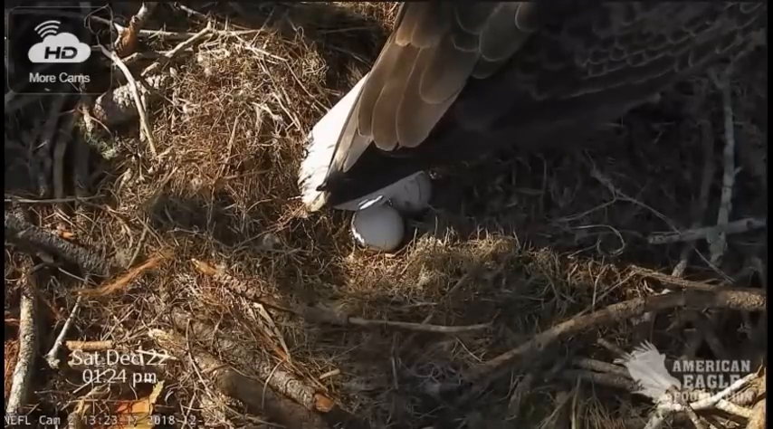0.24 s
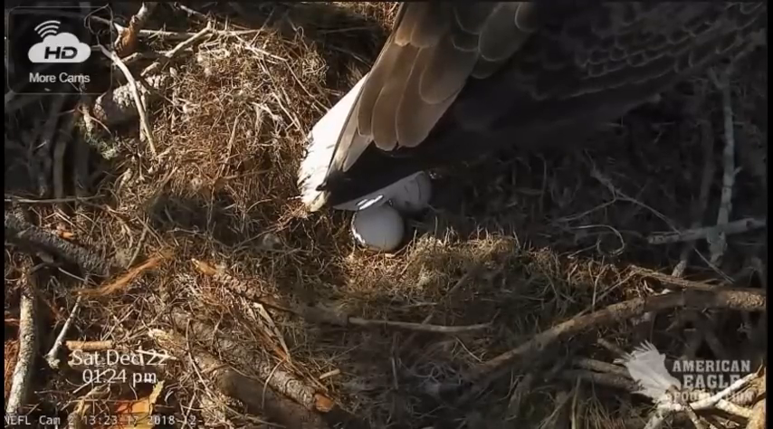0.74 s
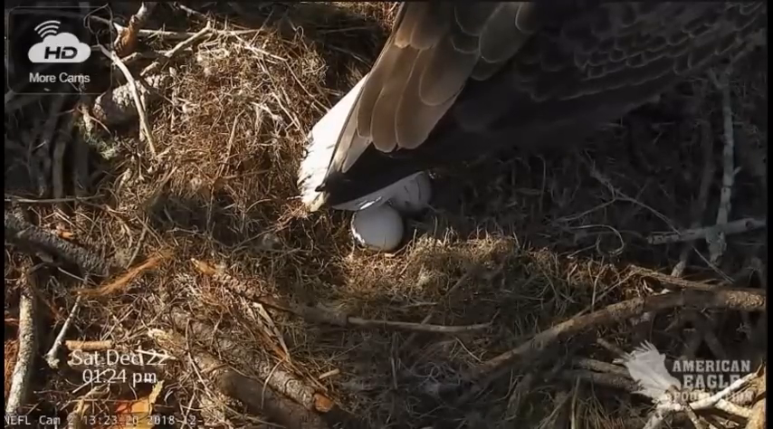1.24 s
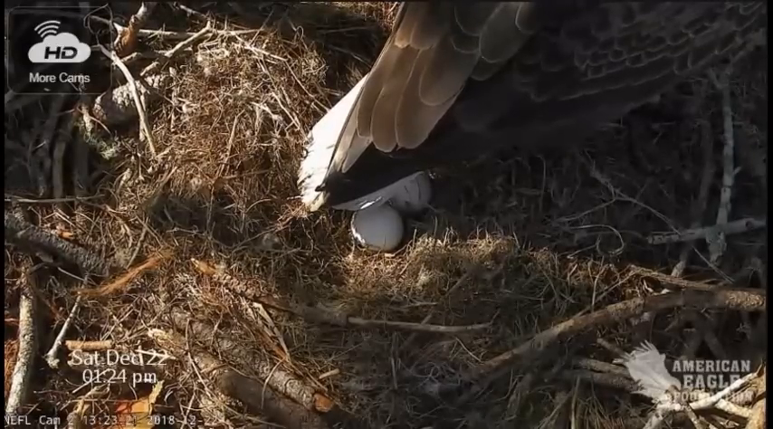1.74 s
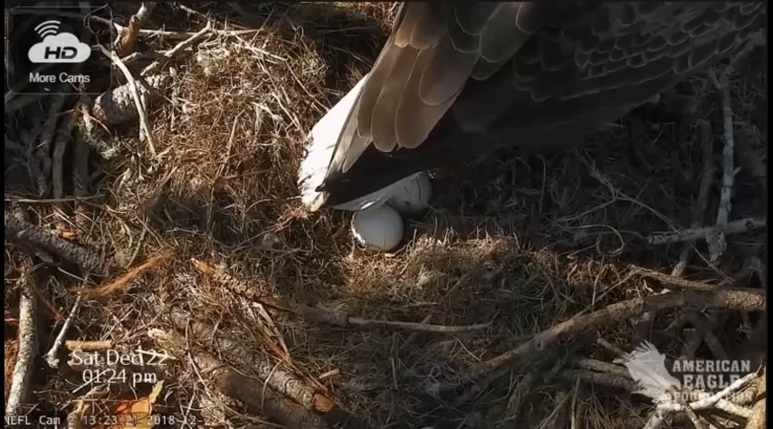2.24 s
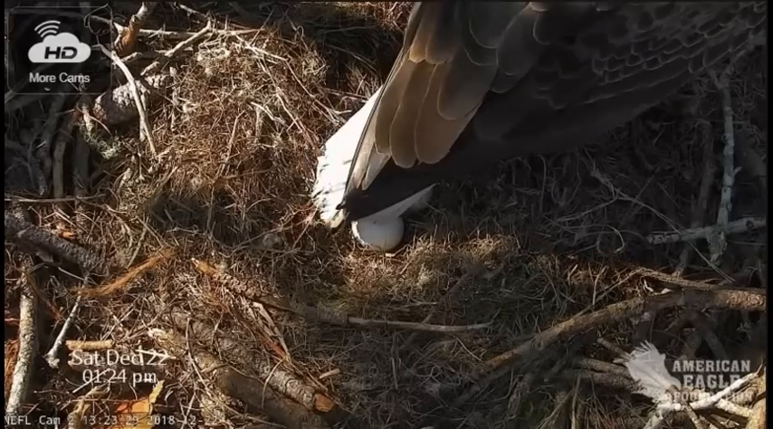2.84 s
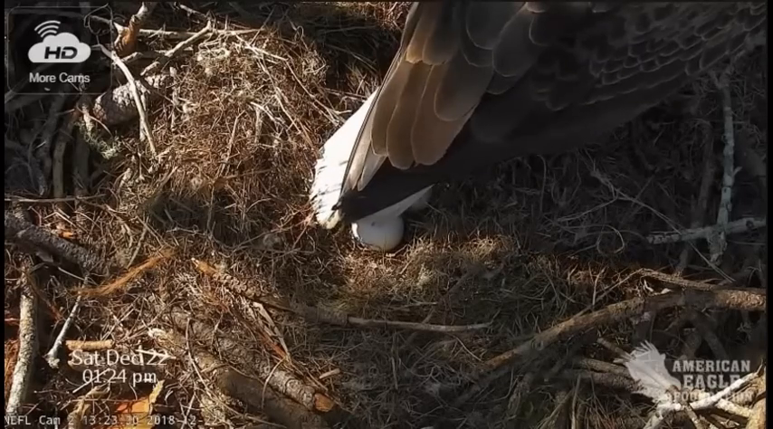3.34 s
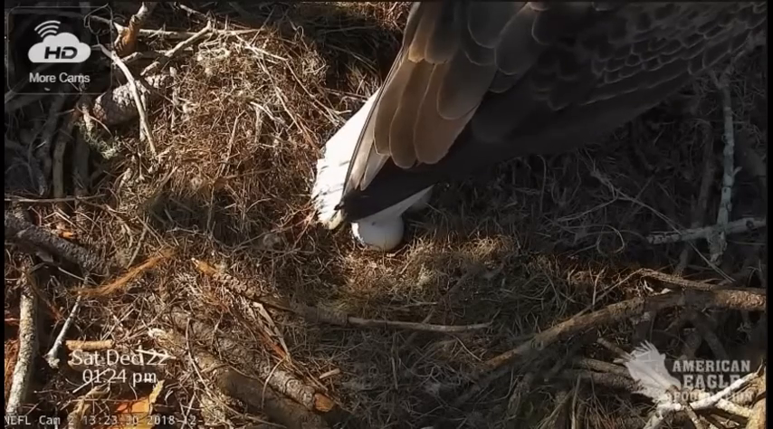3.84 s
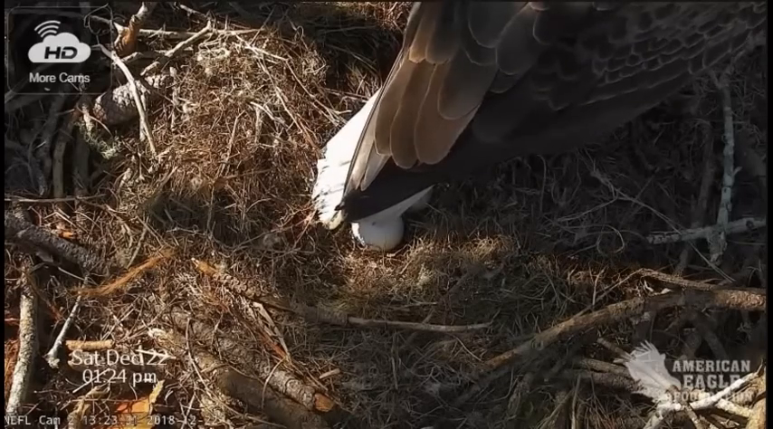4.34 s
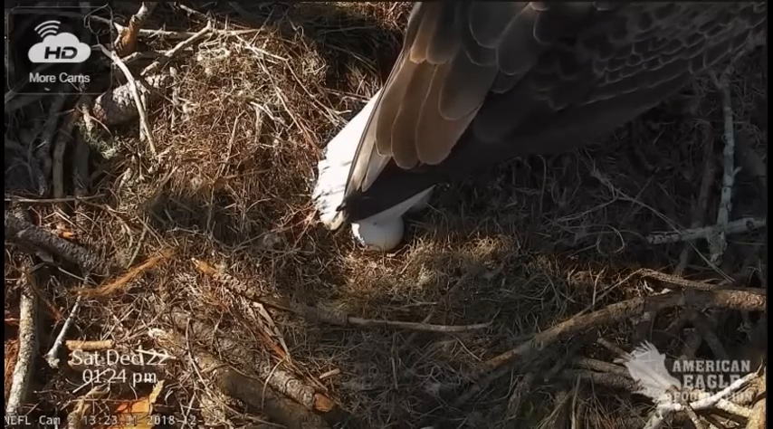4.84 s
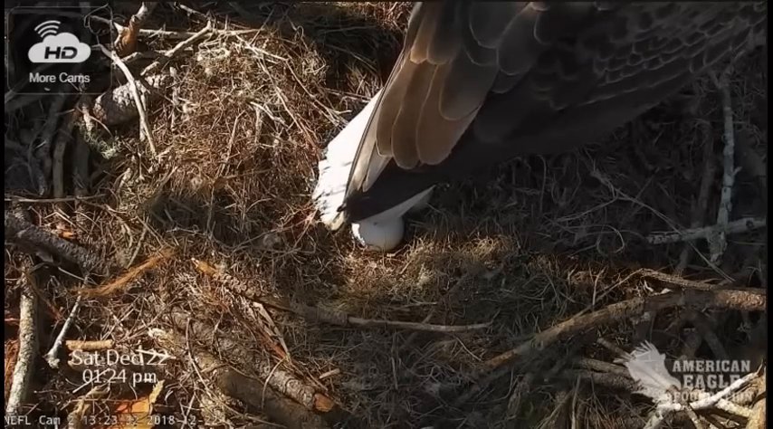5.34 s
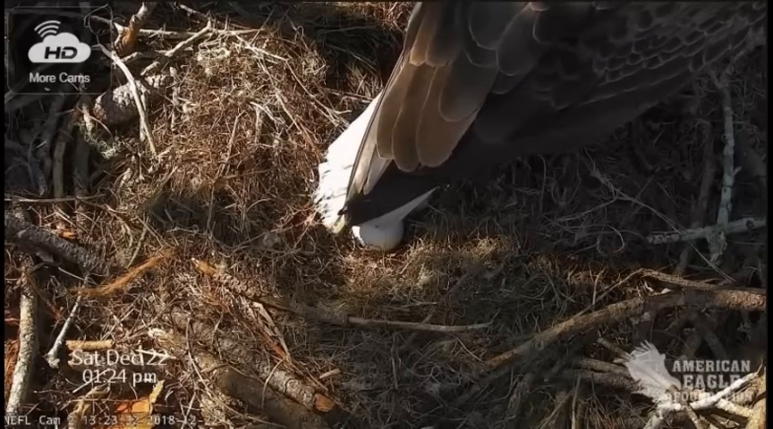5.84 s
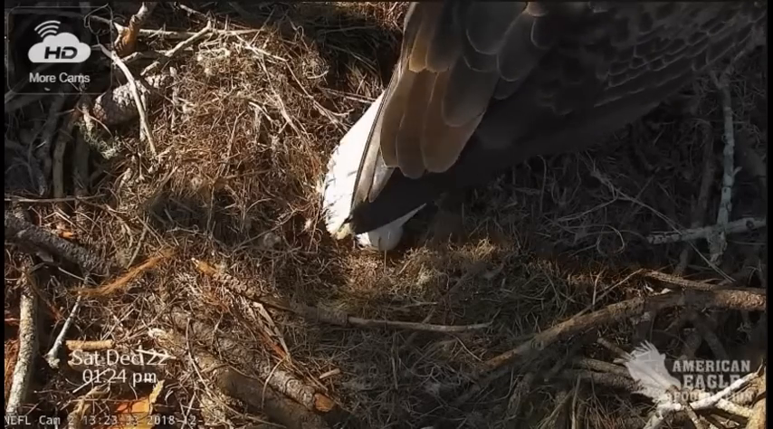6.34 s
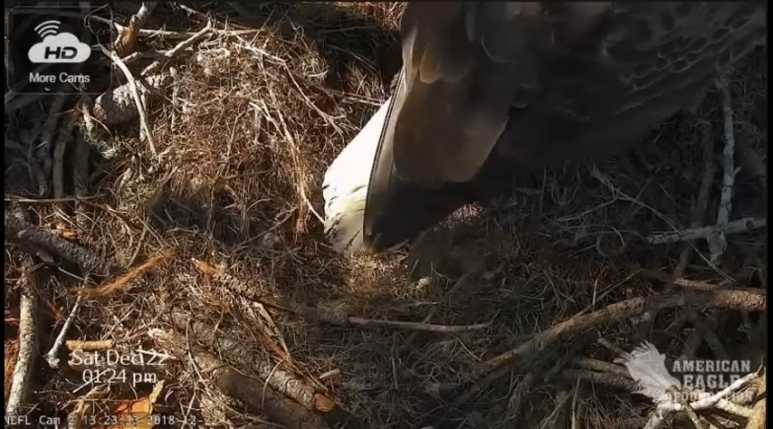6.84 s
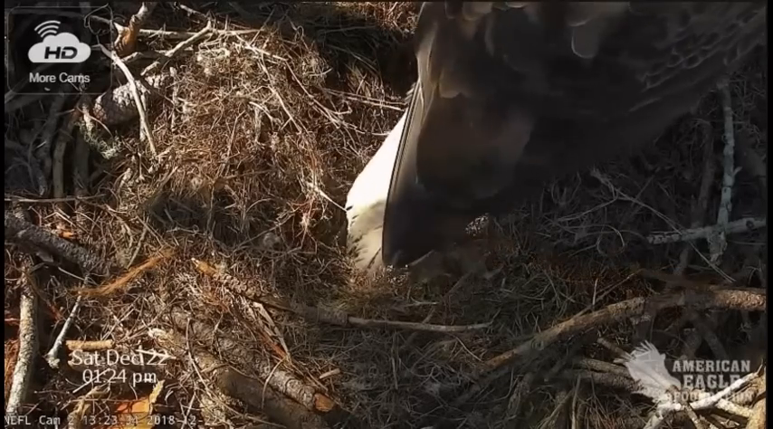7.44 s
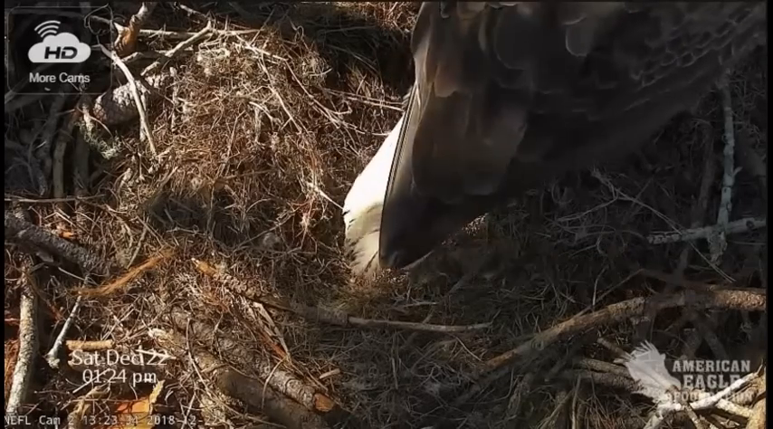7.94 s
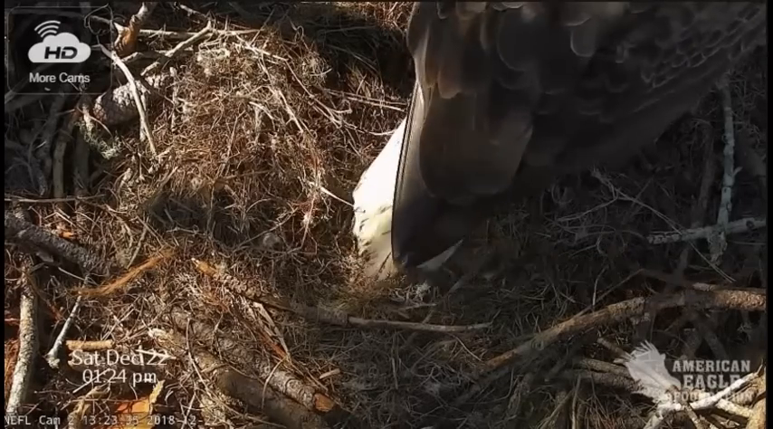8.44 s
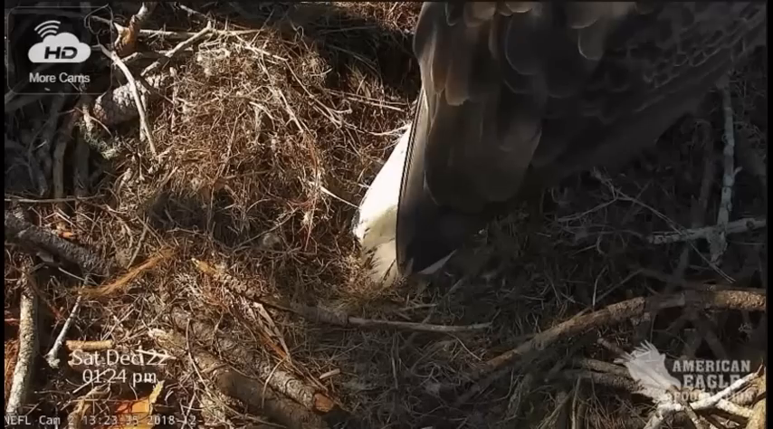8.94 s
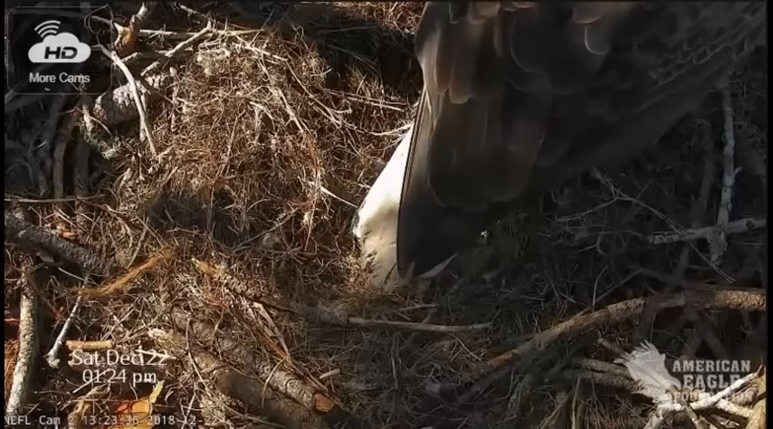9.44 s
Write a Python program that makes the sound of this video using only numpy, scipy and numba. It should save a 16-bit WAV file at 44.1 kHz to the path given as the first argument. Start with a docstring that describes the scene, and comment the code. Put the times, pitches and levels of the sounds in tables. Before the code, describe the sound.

An eagle at its nest gives six bursts of shrill, chittering alarm calls close to the microphone. Most are quick runs of rasps and arched whistles that drop into lower yelps and soft clucks. The third is three rising screams that leap into squeals. Some loud notes in the middle bursts overload the microphone and crack. The woods echo after each burst over a faint, steady hiss.

```python
"""An eagle over its nest gives six bursts of shrill, chittering alarm calls, close to a microphone.
Its syrinx makes rasps, arched whistles, lower yelps and clucks; one burst is three rising screams that
leap into squeals. Some loud notes overload the microphone and crack. The woods ring on over a faint
hiss; a fast limiter flattens the notes and lets the echo swell between them."""
import sys
import numpy as np
from scipy import signal
from scipy.fft import rfft, irfft
from scipy.io import wavfile
from scipy.ndimage import uniform_filter1d, minimum_filter1d
from numba import njit

SR = 44100
rng = np.random.default_rng(int(sys.argv[2]) if len(sys.argv) > 2 else 0)


def file_out(sig):
    """Save sig as 16-bit WAV at sys.argv[1]."""
    # one column per channel
    cols = np.atleast_2d(sig).T
    # limit, then scale
    lim = np.clip(cols, -1, 1)
    pcm = np.round(lim * 32767).astype(np.int16)
    wavfile.write(sys.argv[1], SR, pcm)


N = 429093

# hiss of the woods (frequency [Hz], gain [dB])
WOODS_SPECTRUM = [(15, -42.5), (25, -18), (54, -11), (91, -11.5), (122, -12), (319, -23), (541, -20),
                  (814, -13.5), (1190, -13.5), (2030, -7), (2840, 3.5), (3880, -8.5), (6120, -32),
                  (7780, -56.5), (10100, -73), (17100, -120)]
# echo from the trees (frequency [Hz], gain [dB])
ECHO_SPECTRUM = [(100, 13), (1000, 3.5), (2300, 0.5), (2950, 2), (3150, 4.5), (3300, 3), (3650, -16),
                 (4080, 9.5), (4500, -1.5), (5200, -16.5), (6000, -33.5), (7800, -47.5)]
# hiss in a cluck (frequency [Hz], gain [dB])
PUFF_SPECTRUM = [(500, -12.5), (1500, -39), (2400, 11), (2900, 18.5), (3700, -26.5), (5500, -34.5),
                 (7500, -52.5)]
# rush of air in a note (frequency [Hz], gain [dB])
BREATH_SPECTRUM = [(100, -3), (700, -5), (1100, -17.5), (1600, 1), (2300, 6), (3200, -19), (3900, -15.5),
                   (4500, -32.5), (5400, -17.5), (6100, -6), (7000, -34)]
# beak and throat filter on the overtones (frequency [Hz], gain [dB])
THROAT_RESPONSE = [(3500, -6), (4600, -1), (5200, -4), (5800, 2), (6400, -6), (7000, 3), (7800, -10.5)]
# microphone rattle in a crack (frequency [Hz], gain [dB])
RATTLE_SPECTRUM = [(30, 7.5), (200, 6.5), (700, 3.5), (1400, 6.5), (2100, 1.5), (3000, -5), (4300, -3.5),
                   (5100, -6.5), (6100, 6), (7000, -27), (7600, -35.5)]
# low microphone sputter under loud notes (frequency [Hz], gain [dB])
SPUTTER_SPECTRUM = [(20, 5.5), (70, 0.5), (130, -8), (300, -16.5), (800, -36), (2000, -62)]

# soft clucks (start [s], length [s], pitch [Hz], level [dB])
CLUCK_NOTES = [(1.072, 0.0087, 1526, -31), (2.895, 0.036, 1884, -35.5), (3.024, 0.023, 1307, -44),
               (3.923, 0.019, 1700, -28), (5.999, 0.041, 1763, -44.5), (7.131, 0.03, 1300, -59),
               (8.212, 0.037, 1870, -44)]
# arched whistles (start [s], length [s], mid pitch [Hz], level [dB], hoarseness [0-1], crack [0-1])
WHISTLE_NOTES = [(0.53, 0.066, 2987, -13.5, .06, 0), (0.619, 0.081, 3070, -33.5, 0.3, 0),
                 (0.722, 0.055, 3060, -22.5, .5, 0), (2.175, 0.064, 2948, -21.5, 0.19, 0.43),
                 (2.248, 0.061, 3067, -26.5, 0.41, 0.39), (2.298, .075, 2888, -22, 0.54, 0.05),
                 (2.409, 0.069, 3128, -19.5, 0.34, 0.68), (2.518, 0.081, 2970, -23.5, 0.3, 0.34),
                 (5.04, 0.088, 2960, -18, 0.16, 1), (5.318, 0.082, 3117, -18, 0.27, 0.56),
                 (5.436, 0.073, 3017, -20.5, 0.29, 0.35), (7.216, 0.085, 3153, -19.5, .04, 0),
                 (7.36, 0.0071, 2950, -13.5, .2, 0), (7.407, 0.039, 3203, -28, 0.1, 0.02),
                 (7.438, .046, 2988, -19.5, 0.09, 0), (7.529, 0.074, 3039, -22, 0.16, 0),
                 (7.672, 0.043, 2928, -20, 0.11, 0.01), (9.22, 0.048, 2820, -14, 0.06, 0),
                 (9.284, 0.087, 3167, -38.5, 0.81, 0), (9.391, 0.076, 3103, -33.5, 0.9, 0),
                 (9.507, .066, 2982, -23.5, 0.33, 0), (9.632, 0.049, 2912, -21.5, 0.32, 0.09)]
WHISTLE_START_HZ, WHISTLE_END_HZ = 2957, 2844
# lower, falling yelps (start [s], length [s], pitch [Hz], level [dB], hoarseness [0-1], crack [0-1])
YELP_NOTES = [(0.513, 0.023, 2340, -26, 0.3, 0), (0.772, 0.016, 2558, -19.5, 0.4, 0),
              (0.835, .056, 2470, -21, 0.22, 0), (0.955, 0.032, 2293, -24, 0.08, 0),
              (2.457, 0.037, 2313, -31, 0.12, 0.27), (2.647, 0.059, 2283, -26.5, 0.15, 0.03),
              (2.777, 0.033, 2247, -22.5, 0.11, 0.02), (3.018, 0.035, 2540, -33, 0.15, 0.05),
              (5.567, 0.041, 2400, -22, 0.26, 0.4), (5.707, 0.047, 2322, -25.5, 0.26, 0.03),
              (5.853, 0.042, 2248, -22.5, 0.06, 0), (7.581, .022, 2293, -22, 0.44, 0.08),
              (7.654, .03, 2470, -19, 0.41, 0), (7.786, .05, 2321, -22, 0.23, 0),
              (7.923, 0.045, 2240, -29.5, 0.12, 0), (8.066, 0.042, 2139, -31, .05, 0.01),
              (9.551, 0.031, 2505, -27, 0.3, 0), (9.656, 0.039, 2346, -21, 0.2, 0.12)]
# toneless, rising rasps (start [s], length [s], pitch [Hz], level [dB])
RASP_NOTES = [(2.12, 0.14, 3173, -37), (3.633, 0.028, 2695, -27.5), (4.282, 0.019, 2630, -18),
              (5.013, 0.046, 3010, -28.5), (7.153, 0.093, 3000, -45.5), (7.284, 0.14, 2973, -42),
              (9.177, 0.054, 3110, -35)]
# screams: a climb, then a break upward (start [s], break length [s], climb level [dB], crack [0-1])
SCREAM_NOTES = [(3.645, 0.054, -16, 0.96), (3.937, .036, -18.5, 0.08), (4.295, .034, -18, 0.51)]
# high squeals: a hold, then a slide
# (start [s], hold [s], slide [s], pitch [Hz], hold level [dB], slide level [dB], hoarseness [0-1])
SQUEAL_NOTES = [(2.232, 0.031, 0.028, 3990, -31.5, -22, 0.4), (3.715, .032, 0.033, 4180, -24, -28.5, .45),
                (3.973, .038, 0.031, 4070, -28, -28, 0.4), (4.333, 0.05, 0.053, 3967, -30, -27.5, 0.25),
                (5.117, .049, 0.054, 4000, -29, -18, .22), (5.208, 0.042, 0.069, 3990, -27, -27.5, 0.31)]

# pitch contours (start, middle, end)
YELP_SEMITONES, RASP_SEMITONES = (.55, .077, -.97), (-.8, 0, .64)
CLIMB_HZ, BREAK_HZ = (2197, 2469, 2637), (3150, 3226, 3455)
SQUEAL_SEMITONES, SLIDE_HZ = (-.36, 0, -.48), (3400, 2900, 2927)


def undb(db):
    """Decibels to gain."""
    return 10 ** (np.asarray(db) / 20)


def unit(x):
    """Scale to rms 1."""
    return x / np.sqrt(np.mean(np.abs(x) ** 2))


def colour(x, spectrum):
    """Filter by (frequency [Hz], gain [dB]) points."""
    hz, db = np.transpose(spectrum)
    bins_hz = np.maximum(np.fft.rfftfreq(len(x), 1 / SR), 1)
    return irfft(rfft(x) * undb(np.interp(np.log(bins_hz), np.log(hz), db)), len(x))


def noise(spectrum):
    """Coloured noise, rms 1."""
    return unit(colour(rng.standard_normal(N), spectrum))


def flutter(hz):
    """Random motion up to about hz, rms 1."""
    lowpass = signal.butter(4, hz, fs=SR, output="sos")
    return unit(signal.sosfilt(lowpass, rng.standard_normal(N)))


def gate(t, length_s, rise_s, fall_s):
    """Smooth window from 0 to length_s."""
    return (1 + np.tanh(t / rise_s - 1)) * (1 + np.tanh((length_s - t) / fall_s - 1)) / 4


def span(start_s, length_s):
    """Sample indices around an event and their times [s] from its start."""
    i = np.arange(int((start_s - .01) * SR), min(int((start_s + length_s + .03) * SR), N))
    return i, i / SR - start_s


def bent(hz, semitones):
    """Pitch contour [Hz] around hz."""
    return hz * 2 ** (np.array(semitones) / 12)


@njit
def follow(x, attack_s, release_s):
    """Peak follower."""
    out, envelope = np.empty(len(x)), 0.
    for i in range(len(x)):
        size = abs(x[i])
        envelope += (size - envelope) / (1 + SR * (attack_s if size > envelope else release_s))
        out[i] = envelope
    return out


def woods(level_db=-65.5, swell_db=-.53, swell_hz=1.6):
    """Distant, smooth hiss that barely swells."""
    return noise(WOODS_SPECTRUM) * undb(level_db + swell_db * flutter(swell_hz))


def tree_echo(x, far_t60_s=1.226, far_db=-21, build_s=.043, near_t60_s=.15, near_db=-14):
    """Near limbs scatter the call at once; surrounding trunks return a long, diffuse echo."""
    t = np.arange(2 * SR) / SR
    far = colour(rng.standard_normal(len(t)), ECHO_SPECTRUM) * undb(-60 * t / far_t60_s)
    far *= 1 - np.exp(-t / build_s)
    near = colour(rng.standard_normal(len(t)), ECHO_SPECTRUM) * undb(-60 * t / near_t60_s)
    response = (undb(far_db) * unit(far) + undb(near_db) * unit(near)) / np.sqrt(len(t))
    return signal.fftconvolve(x, response)[:N]


def clucks(rough_rad=.84, rough_hz=300):
    """Low, loose vibration with a puff of hiss in the throat's main resonance."""
    out, stumble = np.zeros(N), flutter(rough_hz)
    puff = noise(PUFF_SPECTRUM)
    for start_s, length_s, hz, db in CLUCK_NOTES:
        i, t = span(start_s, length_s)
        tone = np.sin(2 * np.pi * hz * t + rough_rad * stumble[i])
        out[i] += undb(db) * gate(t, length_s, rise_s=.0021, fall_s=.014) * (tone + puff[i])
    return out


def notes(climb_s=.033, break_delay_s=.018, break_db=-1.5, scream_hoarse=.19):
    """Yields (start [s], length [s], contour [Hz], level [dB], hoarseness [0-1], crack [0-1])."""
    for start_s, length_s, hz, db, hoarse, crack in WHISTLE_NOTES:
        yield start_s, length_s, (WHISTLE_START_HZ, hz, WHISTLE_END_HZ), db, hoarse, crack
    for start_s, length_s, hz, db, hoarse, crack in YELP_NOTES:
        yield start_s, length_s, bent(hz, YELP_SEMITONES), db, hoarse, crack
    for start_s, length_s, hz, db in RASP_NOTES:
        yield start_s, length_s, bent(hz, RASP_SEMITONES), db, 1, 0
    for start_s, length_s, db, crack in SCREAM_NOTES:
        yield start_s, climb_s, CLIMB_HZ, db, scream_hoarse, 0
        yield start_s + break_delay_s, length_s, BREAK_HZ, db + break_db, scream_hoarse, crack
    for start_s, hold_s, slide_s, hz, db, slide_db, hoarse in SQUEAL_NOTES:
        yield start_s, hold_s, bent(hz, SQUEAL_SEMITONES), db, hoarse, 0
        yield start_s + hold_s, slide_s, SLIDE_HZ, slide_db, hoarse, 0


def overload(start_share, length_share, strength):
    """Envelope of one stage of microphone overload, over the same share of each cracking note."""
    out = np.zeros(N)
    for start_s, length_s, _, _, _, crack in notes():
        i, t = span(start_s, length_s)
        window = gate(t - start_share * length_s, length_share * length_s, rise_s=.0006, fall_s=.0012)
        out[i] += crack * strength * window
    return out


def eagle(jitter_hz=170, throb_db=3, throb_hz=190, rise_s=.0025, fall_s=.0075):
    """The syrinx whistles pitch arcs, smeared by uneven vibration. Returns (free voice, voice at mic)."""
    buzz_gain = overload(start_share=.22, length_share=.38, strength=.62)
    rattle_gain = overload(start_share=.35, length_share=.5, strength=1.25)
    jitter, stumble = flutter(jitter_hz), flutter(200)
    unrest = unit(flutter(420) + 1j * flutter(420))
    breath = noise(BREATH_SPECTRUM)
    rattle = noise(RATTLE_SPECTRUM) * undb(2.5 * flutter(200))
    throb = flutter(throb_hz)
    whistle, overtones, cracks = np.zeros((3, N))
    for start_s, length_s, contour_hz, db, hoarse, _ in notes():
        i, t = span(start_s, length_s)
        arc_hz = np.polyval(np.polyfit([0, .5, 1], contour_hz, 2), np.clip(t / length_s, 0, 1))
        jitter_depth = .019 * (.33 + 2.2 * hoarse)
        phase = 2 * np.pi * np.cumsum(arc_hz * (1 + jitter_depth * jitter[i])) / SR
        # hoarseness: irregular, throbbing vibration, softer edges, more breath, weaker overtones
        swing = np.cos(np.pi / 2 * hoarse) + np.sin(np.pi / 2 * hoarse) * unrest[i]
        size, angle = np.sqrt(2) * np.abs(swing), phase + np.angle(swing)
        soften = 1 + 1.8 * hoarse
        envelope = undb(db + np.sqrt(hoarse) * throb_db * throb[i])
        envelope *= gate(t, length_s, rise_s * soften, fall_s * soften)
        breath_gain = undb(-30) * (.13 + 6.4 * hoarse)
        whistle[i] += envelope * (size * np.sin(angle) + breath_gain * breath[i])
        harmonics = undb(-15) * np.sin(2 * angle) + undb(-19.5) * np.sin(3 * angle)
        overtones[i] += envelope * size * (1 - hoarse ** 2) * harmonics
        # the overloaded diaphragm buzzes at half pitch, then rattles at random
        half_phase = phase / 2 + .5 * stumble[i]
        buzz = 1.87 * np.sin(half_phase) + 1.7 * np.sin(half_phase + phase)
        cracks[i] += envelope * (buzz_gain[i] * buzz + rattle_gain[i] * rattle[i])
    voice = whistle + colour(overtones, THROAT_RESPONSE)
    return voice, (voice + cracks) / np.sqrt(1 + 2 * buzz_gain ** 2 + 2 * rattle_gain ** 2)


def scene():
    """Eagle, echo and quiet woods; mono."""
    voice, at_mic = eagle()
    clucking = clucks()
    return (at_mic + clucking + tree_echo(voice + clucking) + woods())[None]


def record(dry, limit_db=-23.5, ahead_s=.043, ahead_db=-6, ramp_s=.00096, coupling_hz=260, top_hz=7750):
    """Look-ahead limiter, overdriven input that distorts and sputters, steep treble cut."""
    limit, ahead = undb(limit_db), int(ahead_s * SR)
    peaks = follow(dry[0], attack_s=.0002, release_s=.02)
    coming = -minimum_filter1d(-peaks, ahead, origin=-(ahead // 2))
    peaks = uniform_filter1d(np.maximum(peaks, undb(ahead_db) * coming), int(ramp_s * SR) + 1)
    limited = dry / limit / (1 + (peaks / limit) ** 4) ** .25
    limited = np.clip(limited, -1.7, 1.7)
    # a lopsided response adds octaves, and low beats between note and echo
    highpass = signal.butter(1, coupling_hz, btype="high", fs=SR, output="sos")
    distortion = .2 * signal.sosfilt(highpass, limited ** 2)
    drive = follow(limited[0], attack_s=.0017, release_s=.099)
    sputter = undb(-27) * drive ** 2 * noise(SPUTTER_SPECTRUM)
    lowpass = signal.ellip(12, .2, 80, top_hz, fs=SR, output="sos")
    return signal.sosfilt(lowpass, limit * (limited + distortion + sputter))


dry = scene()
out = record(dry)
file_out(out)
```